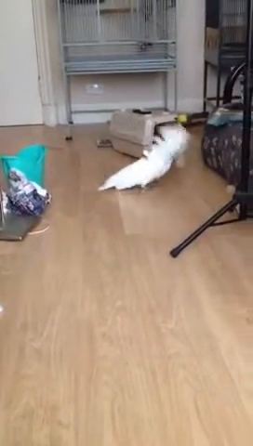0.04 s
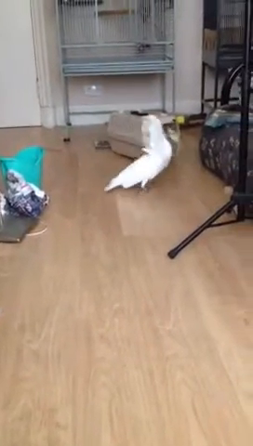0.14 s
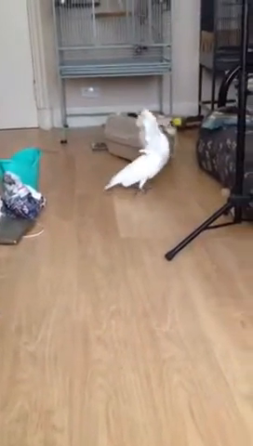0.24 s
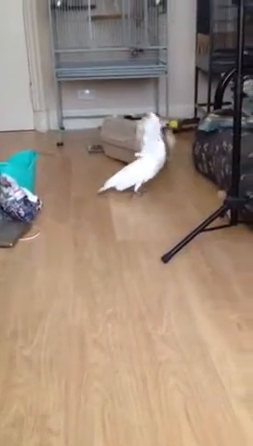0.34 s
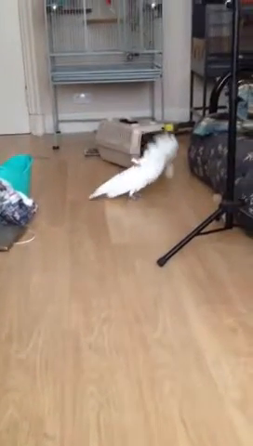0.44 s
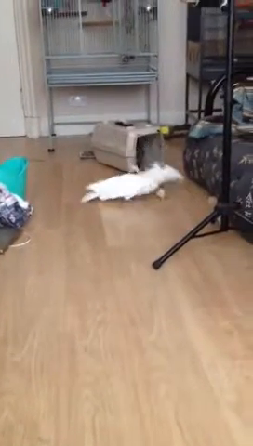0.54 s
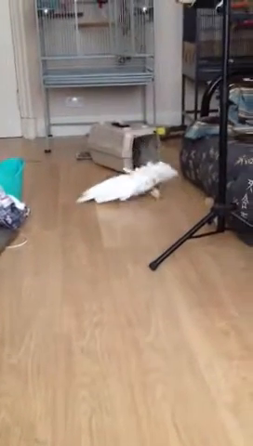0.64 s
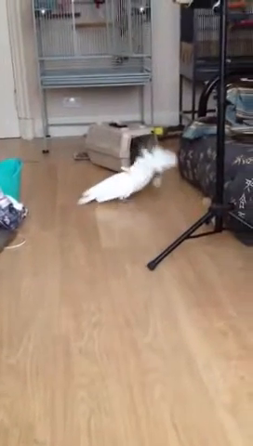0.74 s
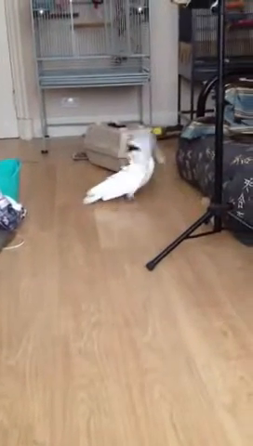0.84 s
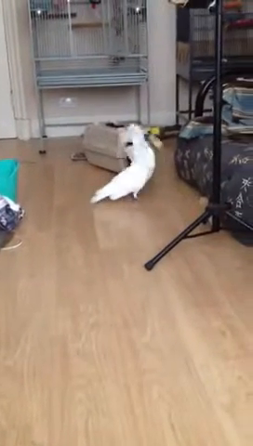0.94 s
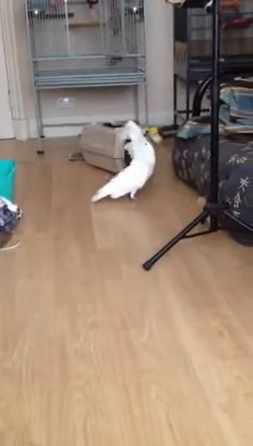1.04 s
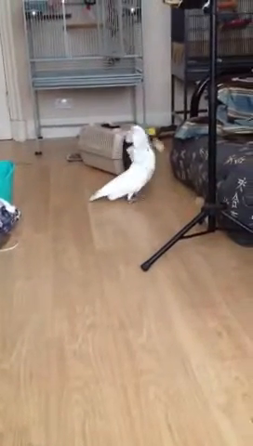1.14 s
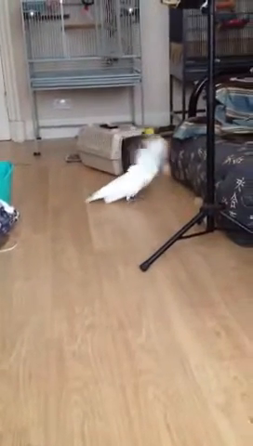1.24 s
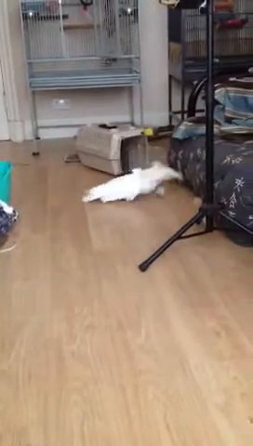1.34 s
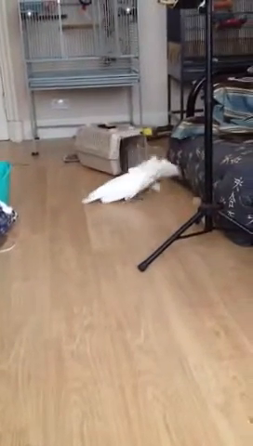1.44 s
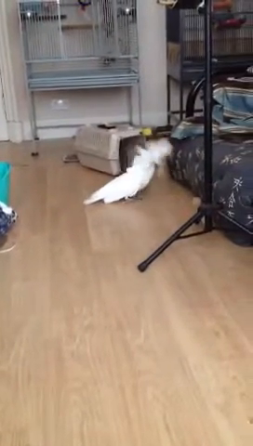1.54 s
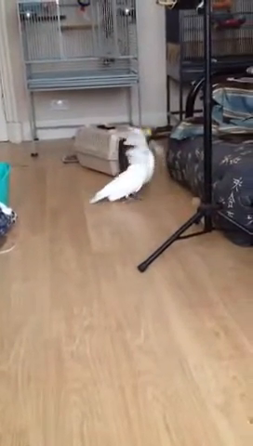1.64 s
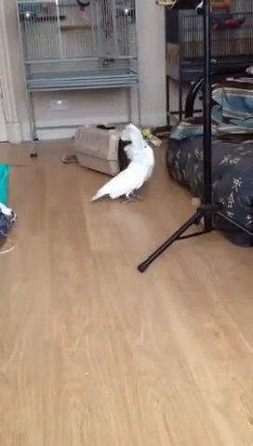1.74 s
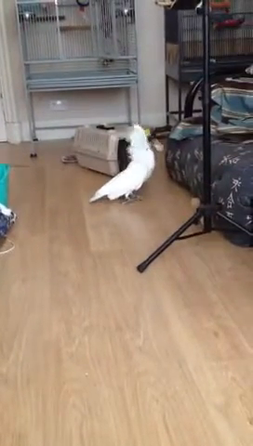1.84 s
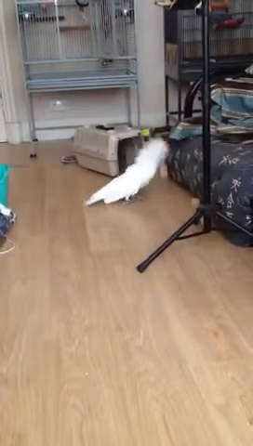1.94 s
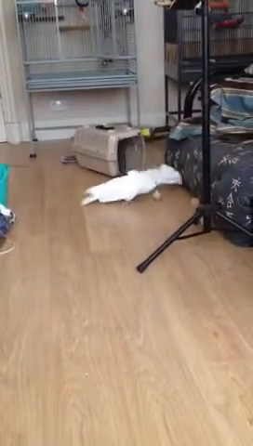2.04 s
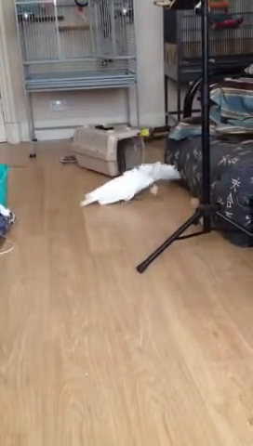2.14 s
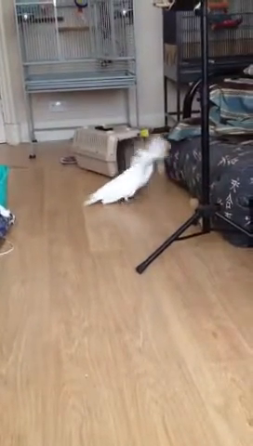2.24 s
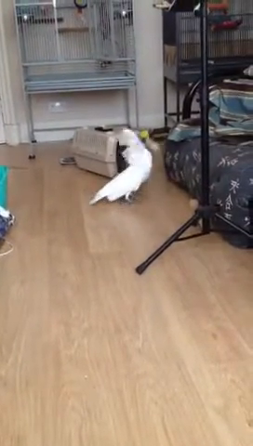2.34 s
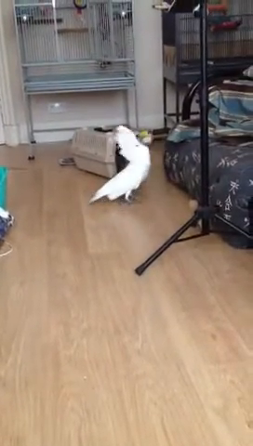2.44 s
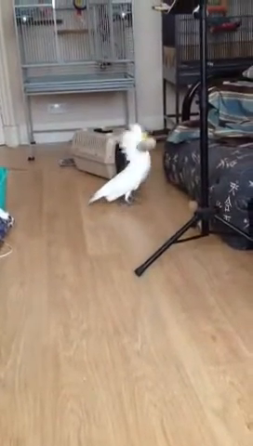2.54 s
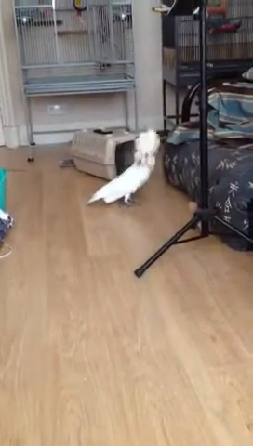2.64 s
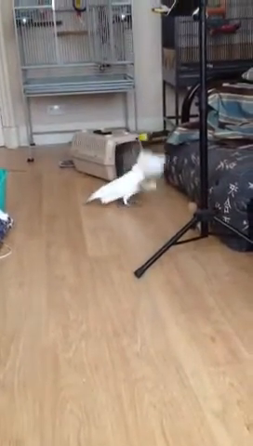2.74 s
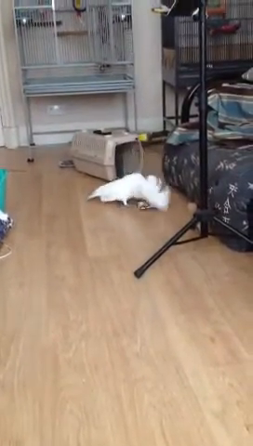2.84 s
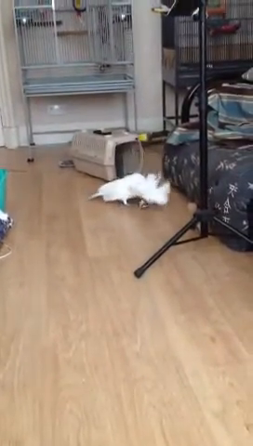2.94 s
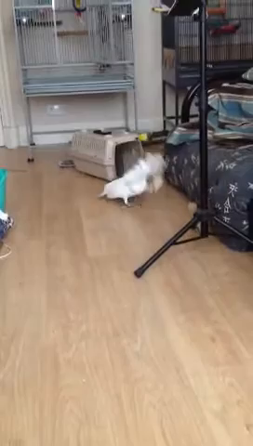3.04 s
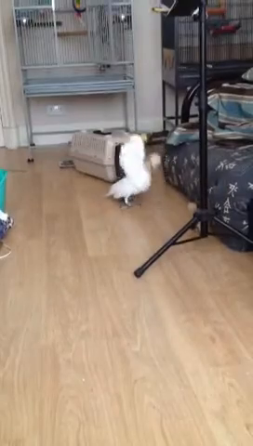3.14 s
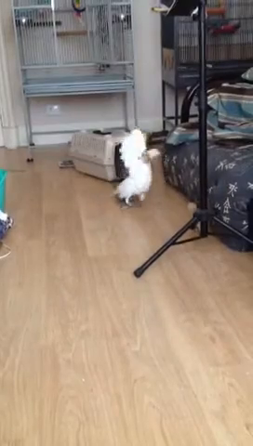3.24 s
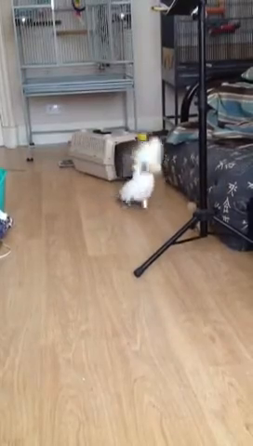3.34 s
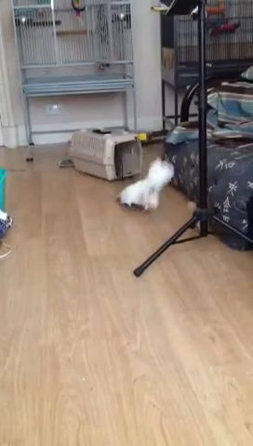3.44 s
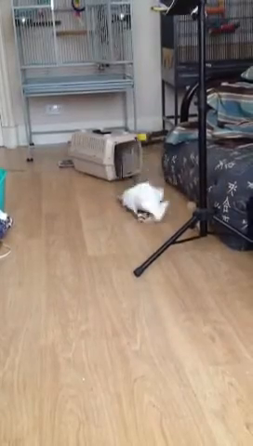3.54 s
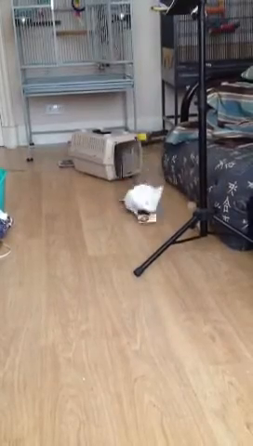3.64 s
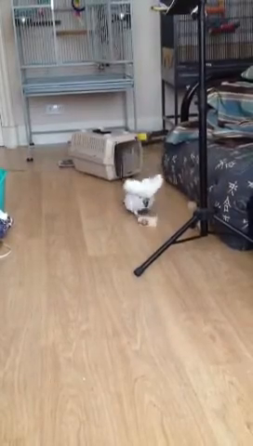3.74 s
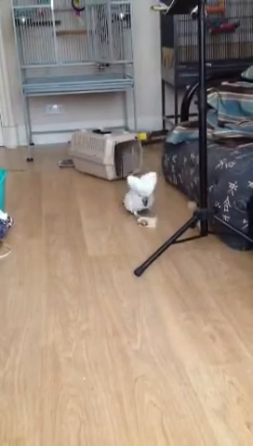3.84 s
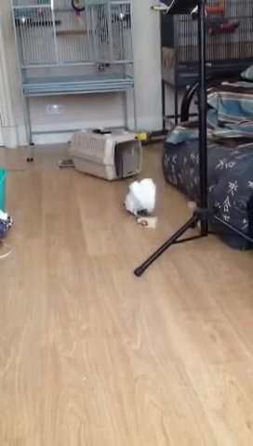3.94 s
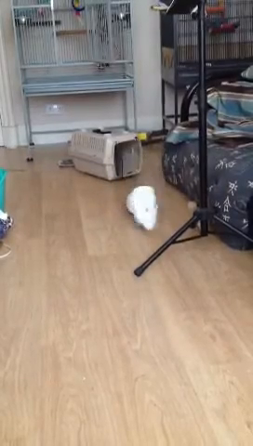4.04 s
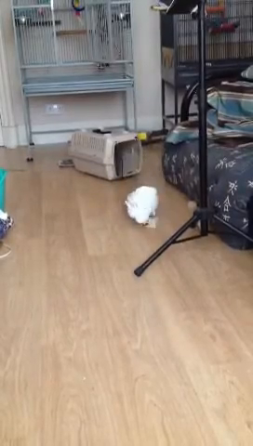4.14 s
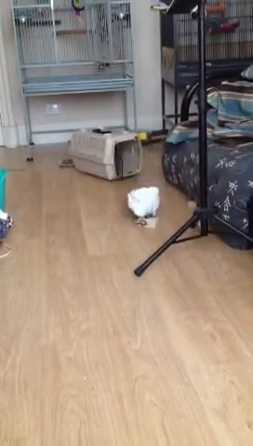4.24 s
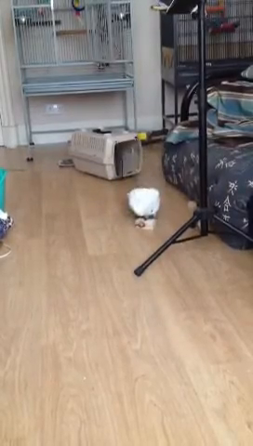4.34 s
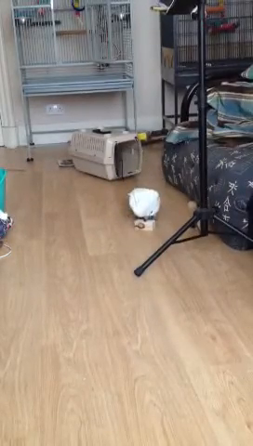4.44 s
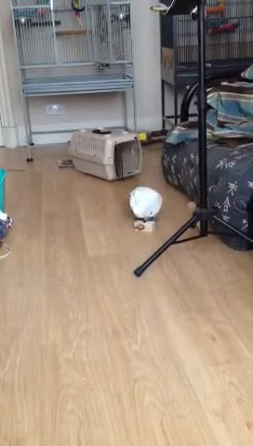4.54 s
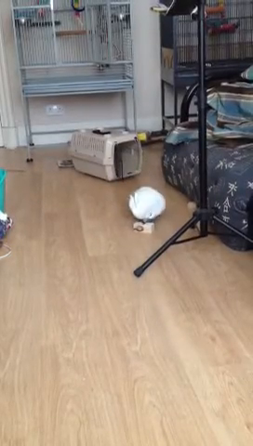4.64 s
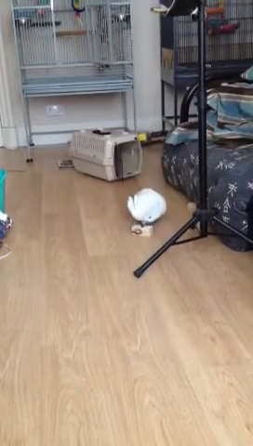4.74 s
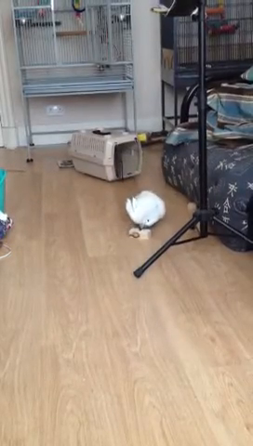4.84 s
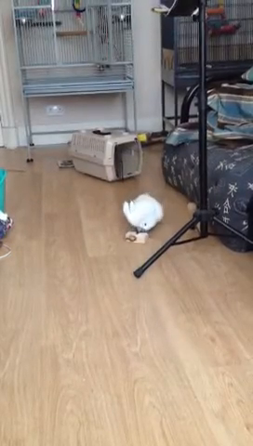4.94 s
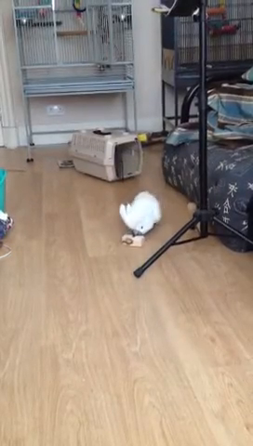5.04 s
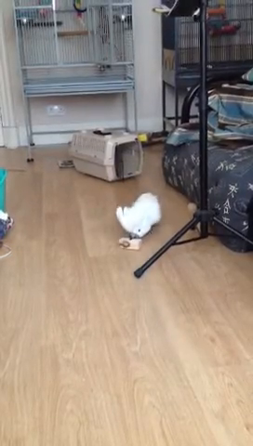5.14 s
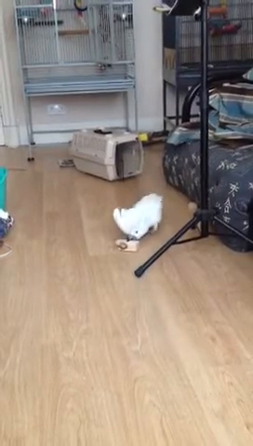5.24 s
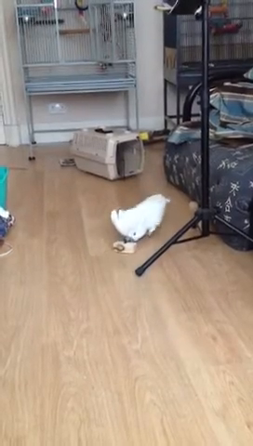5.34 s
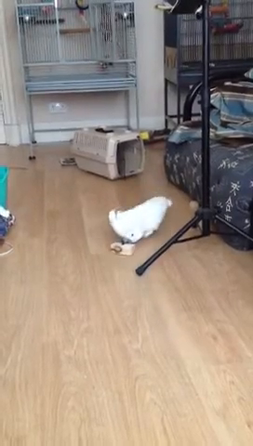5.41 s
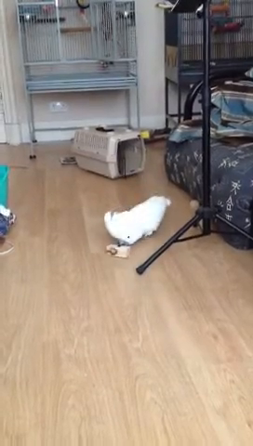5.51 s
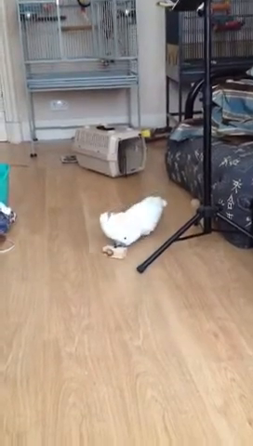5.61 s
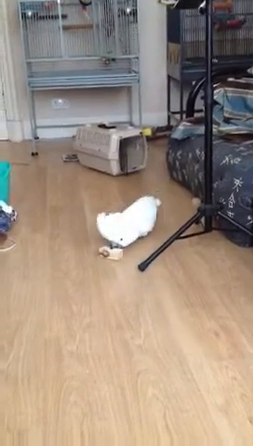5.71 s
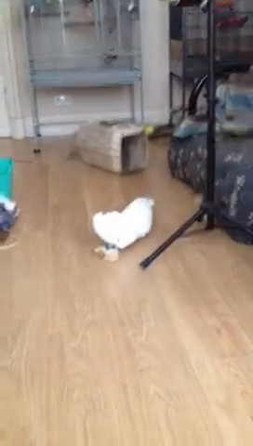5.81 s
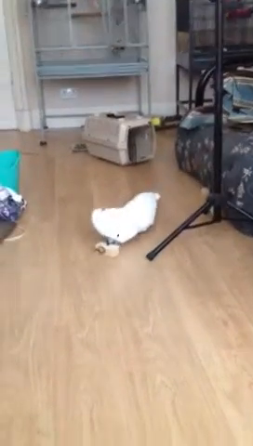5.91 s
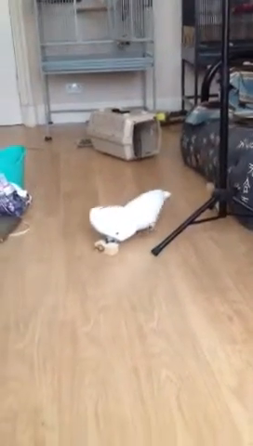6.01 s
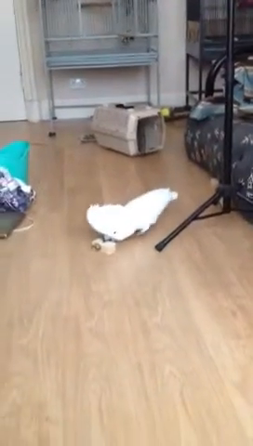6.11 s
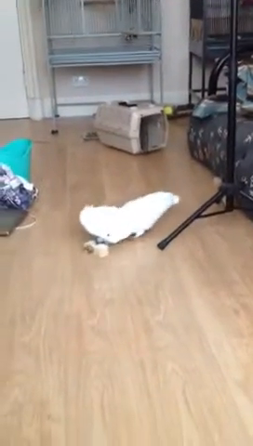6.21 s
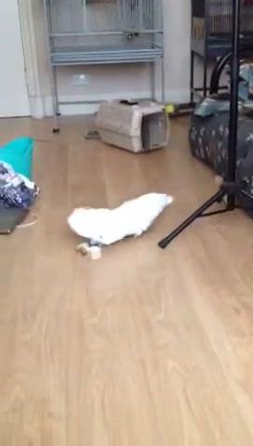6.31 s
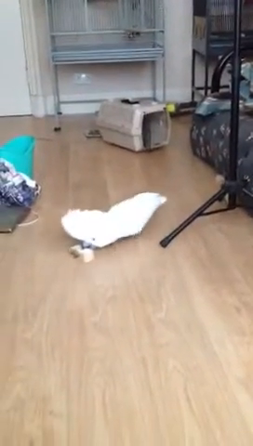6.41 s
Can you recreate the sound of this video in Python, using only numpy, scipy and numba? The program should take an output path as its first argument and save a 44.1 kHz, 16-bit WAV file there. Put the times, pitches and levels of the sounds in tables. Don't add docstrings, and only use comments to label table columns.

```python
import sys
import numpy as np
from scipy import signal
from scipy.fft import rfft, irfft
from scipy.io import wavfile
from scipy.ndimage import uniform_filter1d
from numba import njit

SR = 44100
rng = np.random.default_rng(int(sys.argv[2]) if len(sys.argv) > 2 else 0)


def wav_record(signal):
    frames = np.transpose(np.atleast_2d(signal))
    bounded = np.clip(frames, -1, 1)
    quanta = np.round(bounded * 32767).astype(np.int16)
    wavfile.write(sys.argv[1], SR, quanta)


def nominal_scale(level):
    x = np.asarray(level, float) / 20
    return 10 ** x


N = 285327

# (time [s], peak level [dB], delay of toy's far end [s], far end level [dB], first wall echo [s])
BLOWS = [
    (-.15, -11, 0.00107, -5, 0.0026),
    (0.5181, -4.5, 0.0034, -1.5, .012),
    (1.324, -6, 0.0016, -12, 0.0058),
    (2.0261, -10.5, 0.0025, -1.5, 0.0079),
    (2.8455, -12, 0.0064, 3.5, 0.014),
    (3.5241, -7.5, 0.00273, -6, 0.01),
    (3.7464, -18, .004, -1, 0.011),
    (4.044, -40, 0.00263, -6, 0.0027),
]
# (board thud [dB], hollow above it [dB], hardness corner [Hz], level at the corner [dB],
# level an octave higher [dB])
FACES = [(-8.5, -12, 1000, -18, -20.5), (-14, -20, 3080, -17.5, -30), (-5.5, -17.5, 2020, -10.5, -27),
         (-5, -21, 1270, -15.5, -27.5), (-3.5, -9, 1120, -6.5, -19.5), (-7, -13.5, 2850, -15.5, -31),
         (-4, -14.5, 3200, -21, -31), (7, -6, 900, -10, -25)]
# (low ring [Hz], level [dB], high ring [Hz], level [dB], snap level at the top [dB])
RINGS = [(694, 8, 780, 7, -45), (671.6, 11, 1085, 11.5, -52.5), (273, 9, 890, 4, -51.5),
         (262, 6, 820, 9, -51), (315, 1.5, 650, 5.5, -46), (625, 5.5, 860, 7, -49.5),
         (661, 10.5, 874, 7.5, -63), (360, 2.5, 780, 2, -52)]
RING_OCTAVES = (.12, 0.39)
# (frequency [Hz], level re thud [dB])
DEEP = [(41, -56.5), (70, -22), (125, -14.5)]
THUD_HZ, HOLLOW_HZ, SNAP_HZ = 166.7, 450, 14400
# (frequency [Hz], level [dB])
STANDING = [(167, 5.5), (260, 3.5), (327, 4), (572, 5), (637, 4.5), (890, 5.5), (960, 4), (1040, 1),
            (1190, 4), (1545, 6.5), (2425, 3), (2965, 1)]
STANDING_WIDTH_HZ, BETWEEN_DB = 11, -1
# (frequency [Hz], level [dB])
GRAZING = [(100, -2.5), (300, 4), (1000, 0), (2500, 3.5), (4000, 1.5), (6000, -15.5), (9000, -15),
           (15000, -12.5)]
FAR_TREBLE_DB, DULLER_PER_DB = -1.5, 2.7
BENDING = 0.061
FORERUNNER_S = 0.003

# (time [s], peak level [dB], ring [Hz])
TICKS = [(0.288, -43.5, 4750), (1.116, -47.5, 6020), (2.785, -51.5, 3500), (3.3439, -45, 2620),
         (3.346, -50, 740), (3.349, -36, 4470), (3.3615, -30, 9150), (3.501, -35.5, 4600),
         (5.981, -46, 3380), (6.033, -36.5, 3970), (6.099, -58, 4540), (6.296, -50.5, 4000)]
# (peak time [s], level [dB], rise [s per 20 dB], fade [s per 20 dB], dull part [dB])
RUSTLE = [
    (.302, -53, .012, .17, -8),
    (1.128, -52, .035, .13, -9),
    (.44, -64, .06, .12, -3),
    (.865, -40, .05, .15, -10),
    (.92, -44, .08, .14, -10),
    (3.05, -60, .12, .18, -6),
    (3.352, -41, .008, .15, -10),
    (3.5, -50, .2, .03, -9),
]
# (peak time [s], level [dB], rise [s per 20 dB], fade [s per 20 dB], dull part [dB])
SLIDES = [(3.96, -49.5, 0.057, 0.24, -1.5), (4.14, -53.5, 0.073, .25, -21), (4.34, -57, 0.081, .2, -12),
          (4.43, -49, 0.1, .14, -32), (4.68, -57, 0.053, 0.29, -2.5), (4.82, -45.5, 0.11, 0.47, -6.5),
          (5.1, -55.5, .1, 0.25, -7), (5.24, -42.5, 0.05, 0.25, -12), (5.38, -52.5, .15, .17, 1.5),
          (5.589, -41.5, 0.061, 0.18, -10), (5.72, -52, 0.13, 0.38, 3.5), (5.81, -47.5, 0.16, .12, -3),
          (6.049, -45, 0.085, 0.22, -5.5), (6.27, -51.5, 0.32, 0.114, -5),
          (6.329, -39.5, 0.072, 0.11, -9.5), (6.41, -42.5, 0.043, 0.7, -5)]
AIRY_DB, AIRY_FADE, DULL_FADE = -4, 0.64, 0.91
AIRY_FOLLOWS = 0.4

# (peak time [s], level [dB], rise [s per 20 dB], fade [s per 20 dB], pitch [Hz])
SQUEAK_LOW = [
    (4.014, -49, -0.26, .25, 4130),
    (4.14, -46, 0.1, 0.19, 3620),
    (4.22, -49.5, 0.15, 0.02, 3430),
    (4.42, -46, 0.08, 0.21, 3430),
]
# (peak time [s], level [dB], rise [s per 20 dB], fade [s per 20 dB], pitch [Hz])
SQUEAK_HIGH = [
    (3.968, -51, 0.034, 0.33, 4750),
    (4.122, -47, 0.22, .18, 4640),
    (4.33, -45.5, .04, 0.24, 4750),
    (4.39, -41, 0.12, .15, 4680),
    (4.826, -62, .12, .1, 4318),
    (4.974, -53.5, .05, 0.153, 4740),
]
# (peak time [s], level [dB], rise [s per 20 dB], fade [s per 20 dB], pitch [Hz])
SQUEAK_RISE = [
    (4.8, -46.5, .14, 0.15, 3380),
    (5.25, -48.5, 0.11, 0.16, 3450),
]
# (peak time [s], level [dB], rise [s per 20 dB], fade [s per 20 dB], pitch [Hz])
SQUEAK_THIN = [
    (5.05, -48, .05, 0.19, 3880),
    (5.12, -51, .1, 0.082, 3540),
]
# (peak time [s], level [dB], rise [s per 20 dB], fade [s per 20 dB], pitch [Hz])
SQUEAK_HELD = [
    (5.15, -52.5, 0.066, 0.12, 2720),
    (5.28, -44.5, 0.028, 0.23, 4470),
    (5.41, -61.5, .2, 0.068, 4415),
]
LOW_GLIDE_HZ_S, RISE_GLIDE_HZ_S, THIN_GLIDE_HZ_S = -2500, 10180, -3500

# (peak time [s], level [dB], rise [s per 20 dB], fade [s per 20 dB], block part [dB])
DRAG = [
    (4.1, -61, 0.5, -0.6, -5),
    (4.36, -56, 0.2, 0.16, -5.5),
    (4.7, -60.5, 0.35, 1, -11),
    (4.9, -63, 0.3, 0.5, 5.5),
    (5.14, -56, .1, 0.1, -2),
    (5.42, -60.5, .5, 0.5, 3.5),
    (5.63, -48.5, 0.19, 1.2, -8),
    (5.97, -45.5, 0.33, .5, -12),
    (6.18, -45.5, 0.22, .5, -9.5),
    (6.47, -45, -0.1, 14, -5),
]
# (frequency [Hz], width [Hz], level [dB])
BOARDS = [(166, 44, -5.5), (219, 150, -3), (325.6, 22.3, 0.5), (389.7, 70, -2.5), (258, 32, -6),
          (135, 33, -14.5)]
# (time [s], level of the removed band [dB, 0 is all],
# frequency [Hz])
SOFT_DIP = [
    (4.04, -14, 6100),
    (4.1, -8, 6100),
    (4.24, -.5, 6070),
    (4.31, 1, 6513),
    (4.37, 0.5, 5930),
    (4.47, -.5, 5700),
    (4.58, -2, 5620),
]

# (frequency [Hz], time to fall 60 dB [s])
ROOM_T60 = [(100, 0.44), (250, 0.41), (700, 0.52), (2000, 0.54), (5000, 0.53), (9000, 0.44), (15000, .3)]
ECHO_DB = 7.5
# (frequency [Hz], density [dB per Hz])
QUIET = [(40, -28), (100, -13), (160, 3.5), (300, 2), (500, -3.5), (900, -6.5), (2000, -11), (3500, -13.5),
         (6000, -12.5), (8500, -14.5), (10000, -24.5), (11500, -18), (13500, -16), (15500, -15.5)]
QUIET_DB = -67
TOP_HZ = 15430


def knocks():
    out = np.zeros(N)
    for (s, db, *contact), face, rings in zip(BLOWS, FACES, RINGS):
        add(out, nominal_scale(db) * blow(face, rings, *contact), s - FORERUNNER_S)
    return out


def blow(face, rings, delay, second_db, first_wall, size=4096):
    f = np.arange(size // 2 + 1) * SR / size
    t = np.arange(size) / SR
    pulse = causal(colour(face, rings, f)) * np.exp(-2j * np.pi * f * FORERUNNER_S)
    treble_db = min(FAR_TREBLE_DB - DULLER_PER_DB * second_db, 5.0)
    far_end = causal(read([(1200, second_db), (2800, second_db + treble_db)], f))
    far_end = far_end * np.exp(-2j * np.pi * f * delay)
    bending = np.exp(-4j * np.pi * BENDING * np.sqrt(f))
    direct = irfft(pulse * causal(read(GRAZING, f)) * (1 + far_end) * bending, size)
    rattle = rfft(np.diff(rng.standard_normal(size + 1)) * np.exp(-t / 0.0026))
    swell = (t / FORERUNNER_S) ** 3 * (t < FORERUNNER_S + 0.0008)
    ahead = np.sin(2 * np.pi * (5500 * t - 3.5e5 * t ** 2)) * swell
    out = signal.fftconvolve(irfft(pulse, size), room(first_wall))
    out[:size] += direct + nominal_scale(-21) * irfft(pulse * rattle, size)
    out /= np.max(np.abs(direct))
    out[:size] += nominal_scale(colour(face, rings, 2900) - 2.5) * ahead
    return out


def colour(face, rings, hz):
    thud_db, hollow_db, corner_hz, corner_db, above_db = face
    low_hz, low_db, high_hz, high_db, snap_db = rings
    deep = [(f, thud_db + db) for f, db in DEEP]
    contact = [(THUD_HZ, thud_db), (HOLLOW_HZ, hollow_db), (corner_hz, corner_db), (2 * corner_hz, above_db)]
    db = read([*deep, *contact, (SNAP_HZ, snap_db)], hz)
    for (ring_hz, ring_db), octaves in zip(((low_hz, low_db), (high_hz, high_db)), RING_OCTAVES):
        db = db + ring_db / (1 + (np.log2(np.maximum(hz, 1) / ring_hz) / octaves) ** 2)
    for mode_hz, mode_db in STANDING:
        db = db + mode_db / (1 + ((hz - mode_hz) / STANDING_WIDTH_HZ) ** 2)
    return db + BETWEEN_DB * (hz < 2000)


def squeak(table, width_hz, skirt_db, octave_db, glide_hz_s=0):
    t = np.arange(N) / SR
    hz = np.full(N, 1. * table[0][-1])
    for s, _, rise, _, held_hz in table:
        taken = t > s - min(1.4 * rise, 0.19)
        hz[taken] = held_hz - glide_hz_s * np.maximum(s - t[taken], 0)
    hz = uniform_filter1d(hz, size=600)
    tone = unit(band(rng.standard_normal(N), hz, width_hz))
    skirt = band(rng.standard_normal(N), 1.064 * hz, 4 * width_hz)
    skirt = unit(band(skirt, 1.064 * hz, 4 * width_hz))
    octave = unit(band((tone + skirt) ** 2, 2 * hz, 4 * width_hz))
    rubbing = tone + nominal_scale(skirt_db) * skirt + nominal_scale(octave_db) * octave
    return nominal_scale(-0.5) * strokes(table) * flicker(25, 0.84) * rubbing


def rustle():
    rows = RUSTLE + SLIDES
    level = strokes(rows)
    dull_level = strokes(rows, DULL_FADE, 1)
    airy_level = strokes(rows, AIRY_FADE, AIRY_FOLLOWS)
    grains = rng.standard_normal((4, N)) * nominal_scale(5.3 * rng.standard_normal((4, N)))
    dull = dull_level * unit(band(grains[0], 2300, 4100)) * flicker(18.0, 0.52)
    body_level = nominal_scale(4.5) * np.sqrt(level * dull_level)
    body = body_level * unit(band(grains[1], 4500, 3600)) * flicker(16, 4.5)
    main = level * unit(band(grains[2], 7200, 3300)) * flicker(35, 0.76)
    airy = nominal_scale(AIRY_DB) * airy_level * unit(band(grains[3], 13000, 7000))
    return nominal_scale(-6.0) * (dull + body + main + airy)


def drag():
    boards = sum(nominal_scale(db) * unit(band(rng.standard_normal(N), hz, width)) for hz, width, db in BOARDS)
    block = unit(band(rng.standard_normal(N), 642, 422))
    hum = strokes(DRAG) * unit(boards) + strokes(DRAG, part=0.91) * block
    return nominal_scale(-3.5) * flicker(10, 1.4) * hum


def ticks():
    out = np.zeros(N)
    for s, db, hz in TICKS:
        grit = np.diff(rng.standard_normal(4097)) * 1000. ** (-np.arange(4096) / SR / 0.0072)
        add(out, nominal_scale(db) * (ring(hz, 18 / hz) + 0.21 * grit), s)
    return out


def room(first_wall=.009, size=36000):
    t = np.arange(size) / SR - first_wall
    unevenness = np.exp(-np.abs(t) / 0.026)
    echoes = rng.standard_normal(size) * nominal_scale(5.6 * rng.standard_normal(size) * unevenness)
    spectrum = rfft(echoes)
    f = np.arange(size // 2 + 1) * SR / size
    tail = 0
    for k, (_, t60) in enumerate(ROOM_T60):
        share = read([(centre, j == k) for j, (centre, _) in enumerate(ROOM_T60)], f)
        tail = tail + irfft(spectrum * share, size) * 1000. ** (-t / t60)
    tail *= np.clip(t / 0.0032, 0, 1) + 0.44 * (t > .003 - first_wall)
    return tail * nominal_scale(ECHO_DB) / np.sqrt(np.sum(tail ** 2))


def quiet():
    f = np.arange(N // 2 + 1) * SR / N
    hush = irfft(rfft(rng.standard_normal(N)) * nominal_scale(read(QUIET, f)), N)
    return nominal_scale(QUIET_DB) * unit(hush)


def strokes(table, fade_share=1, part=0):
    t, power = np.arange(N) / SR, np.zeros(N)
    for s, db, rise, fade, last in table:
        start = max(int((s - 3 * rise) * SR), 0)
        near = slice(start, int((s + 3 * fade * fade_share) * SR))
        fall = np.maximum((s - t[near]) / rise, (t[near] - s) / (fade * fade_share))
        power[near] += nominal_scale(2 * (db + part * last - 20 * fall))
    return np.sqrt(power)


def flicker(rate, depth_db):
    k = int(SR / rate)
    pressure = np.repeat(rng.standard_normal(N // k + 1), k)
    return nominal_scale(depth_db * uniform_filter1d(pressure, k)[:N])


def ring(hz, t60, size=4096):
    t = np.arange(size) / SR
    return np.sin(2 * np.pi * hz * t) * 1000. ** (-t / t60)


@njit
def svf(x, hz, width):
    y, b, l = np.empty(len(x)), 0., 0.
    for i in range(len(x)):
        g, k = np.tan(np.pi * hz[i] / SR), width / hz[i]
        v = (b + g * (x[i] - l)) / (1 + g * (g + k))
        b = 2 * v - b
        l = l + 2 * g * v
        y[i] = k * v
    return y


def band(x, hz, width_hz):
    hz = hz + np.zeros(len(x))
    return svf(svf(x, hz, 1. * width_hz), hz, 1. * width_hz)


def causal(db, size=4096):
    cepstrum = irfft(db * np.log(10) / 20, size)
    cepstrum[1:size // 2] *= 2
    cepstrum[size // 2 + 1:] = 0
    return np.exp(rfft(cepstrum))


def read(table, hz):
    f, v = np.transpose(table)
    return np.interp(np.log(np.maximum(hz, 1)), np.log(f), v)


def play(table):
    first, last = table[0], table[-1]
    rows = [(first[0] - .015, -110, *first[2:]), *table, (last[0] + .015, -110, *last[2:])]
    s, *columns = np.transpose(rows)
    return [np.interp(np.arange(N) / SR, s, c) for c in columns]


def unit(x):
    return x / np.sqrt(np.mean(x ** 2))


def add(out, x, s):
    i = int(round(s * SR))
    part = x[max(-i, 0):N - i]
    out[max(i, 0):max(i, 0) + len(part)] += part


def scene():
    squeaks = squeak(SQUEAK_LOW, 270, -0.65, -10.5, LOW_GLIDE_HZ_S)
    squeaks += squeak(SQUEAK_HIGH, 335, -2.1, -28)
    squeaks += squeak(SQUEAK_RISE, 510, 5.0, -21, RISE_GLIDE_HZ_S)
    squeaks += squeak(SQUEAK_THIN, 220, -7, -29.0, THIN_GLIDE_HZ_S)
    squeaks += squeak(SQUEAK_HELD, 170, -9, -20.0)
    echo, clicks = room(), ticks()
    rubbing = nominal_scale(-3) * (rustle() + squeaks)
    echoed = signal.fftconvolve(nominal_scale(-16.5) * rubbing + nominal_scale(-6.5) * clicks, echo)[:N]
    soft = rubbing + clicks + echoed + quiet()
    depth_db, dip_hz = play(SOFT_DIP)
    for _ in range(2):
        soft = soft - np.minimum(nominal_scale(depth_db), 1) * svf(soft, dip_hz, 570.0)
    return (knocks() + soft + drag())[None]


def roll_off(x):
    return signal.sosfilt(signal.butter(12, 15990, fs=SR, output="sos"), x)


def record(dry):
    bass_cut = signal.butter(3, 100, "high", fs=SR, output="sos")
    top_cut = signal.ellip(10, .2, 70, TOP_HZ, fs=SR, output="sos")
    mix = signal.sosfilt(top_cut, signal.sosfilt(bass_cut, dry))
    return roll_off(mix)


dry = scene()
out = record(dry)
wav_record(out)
```